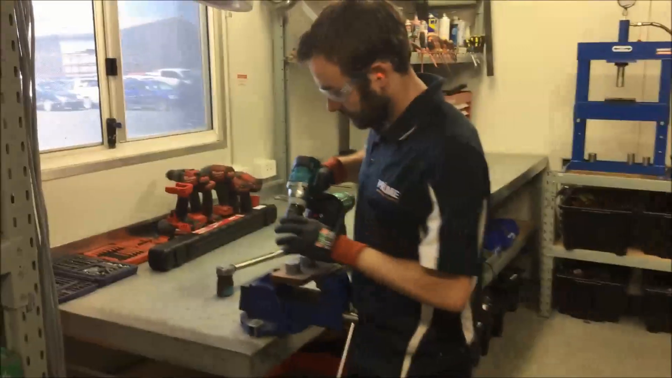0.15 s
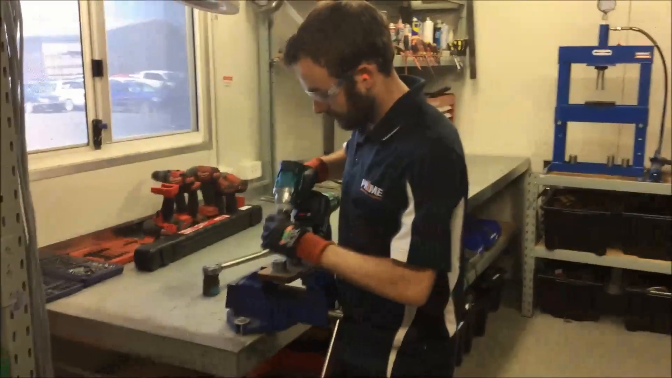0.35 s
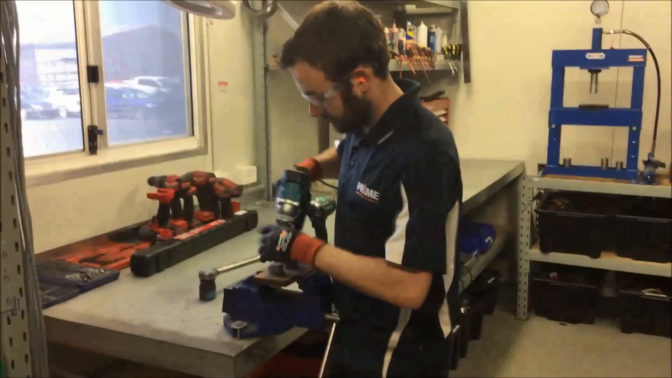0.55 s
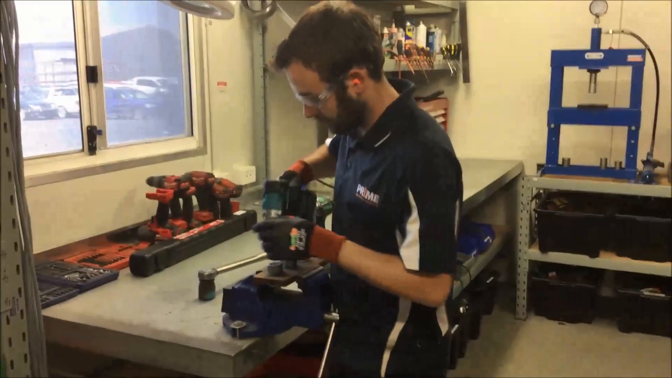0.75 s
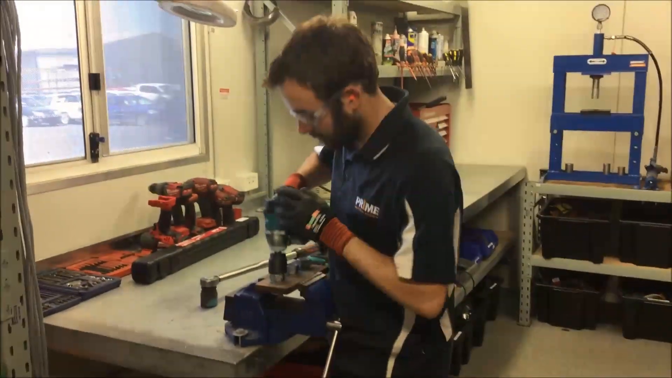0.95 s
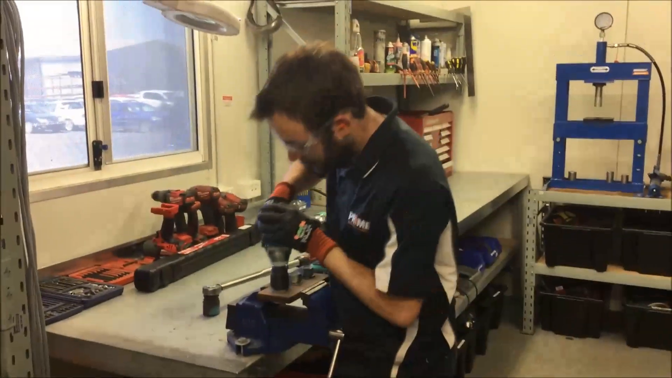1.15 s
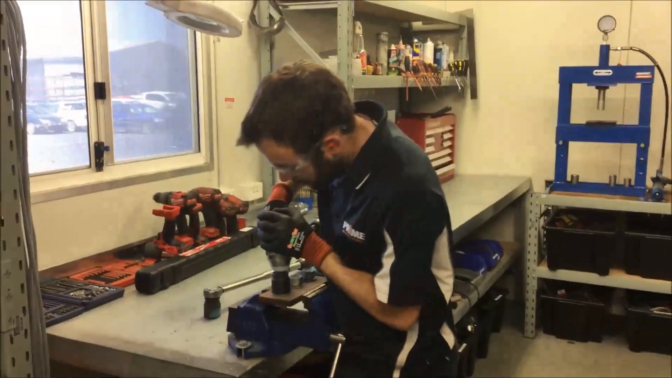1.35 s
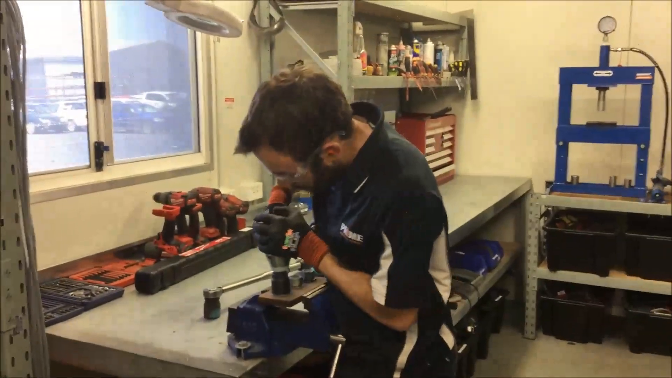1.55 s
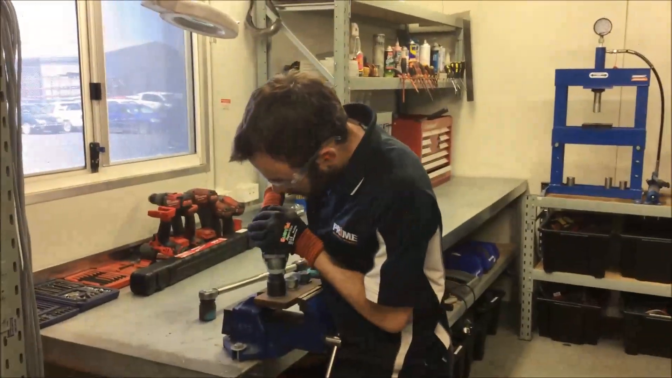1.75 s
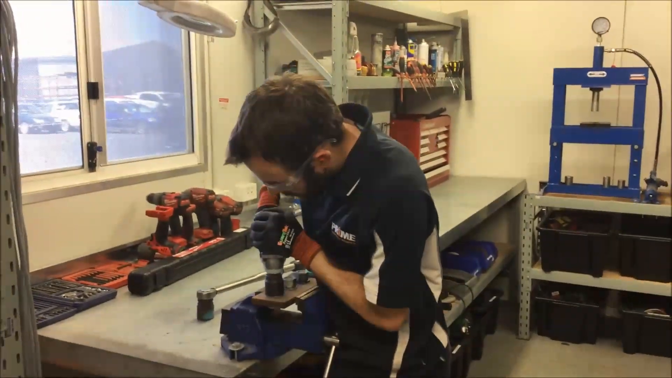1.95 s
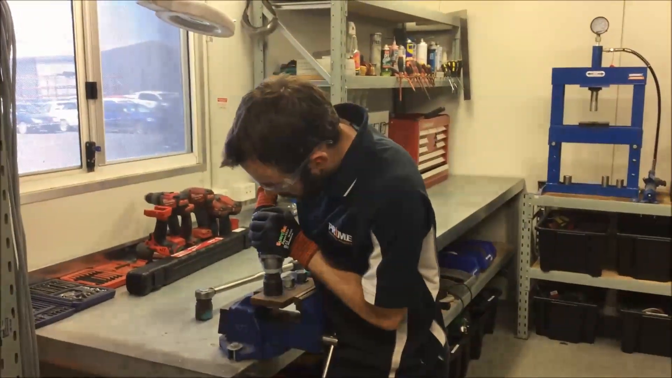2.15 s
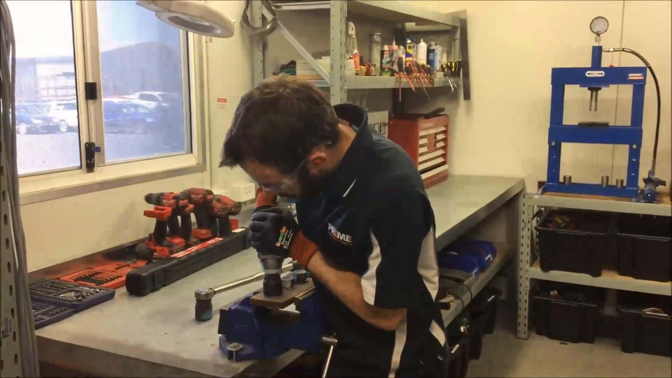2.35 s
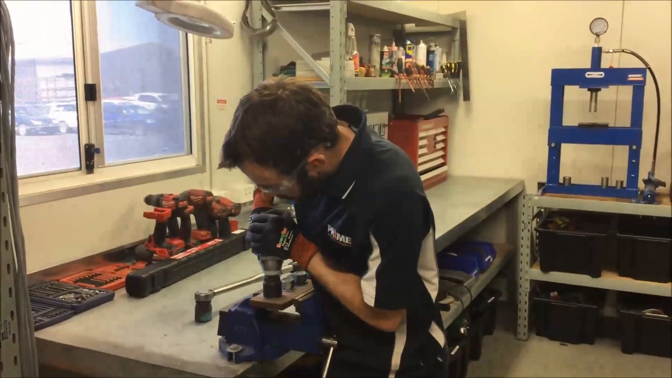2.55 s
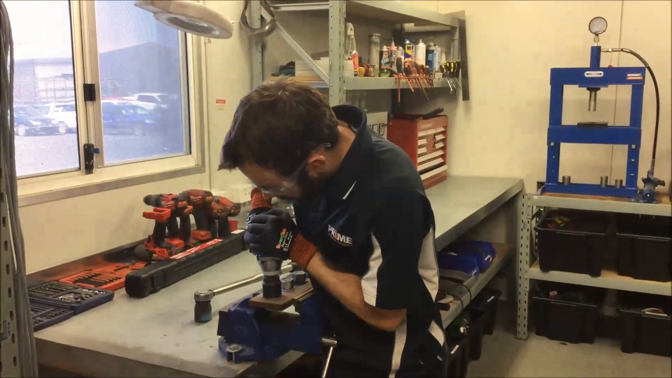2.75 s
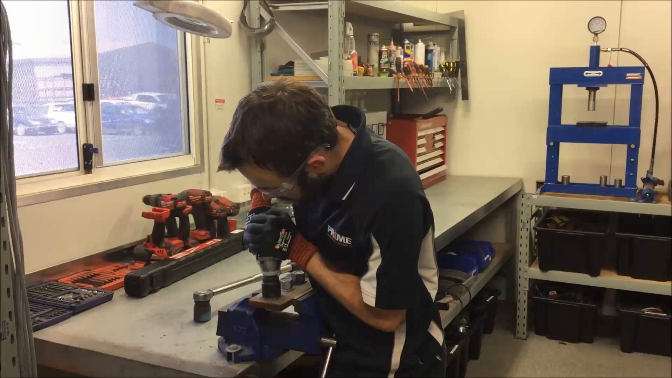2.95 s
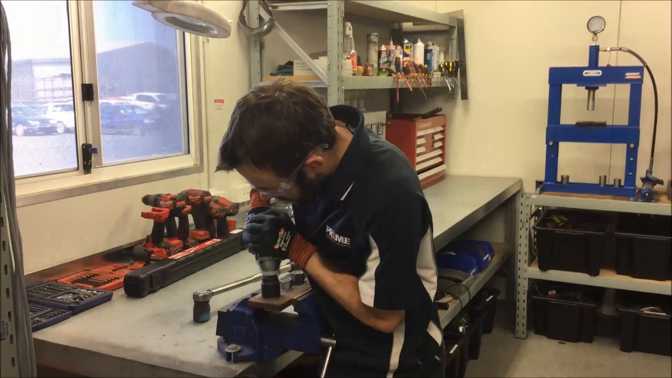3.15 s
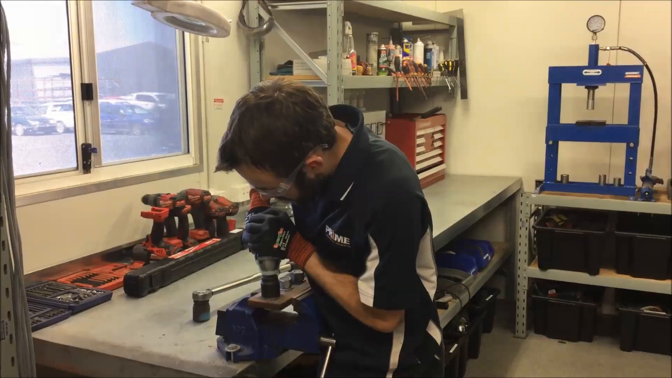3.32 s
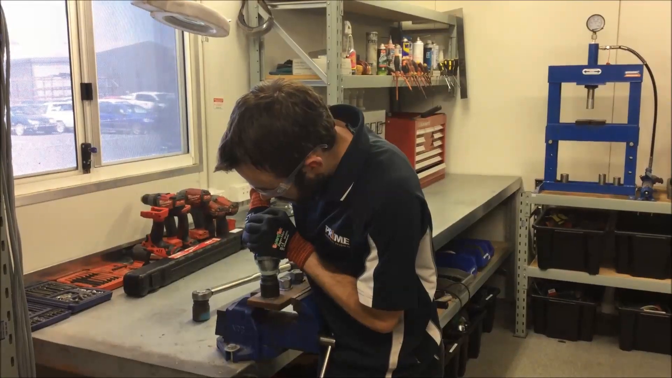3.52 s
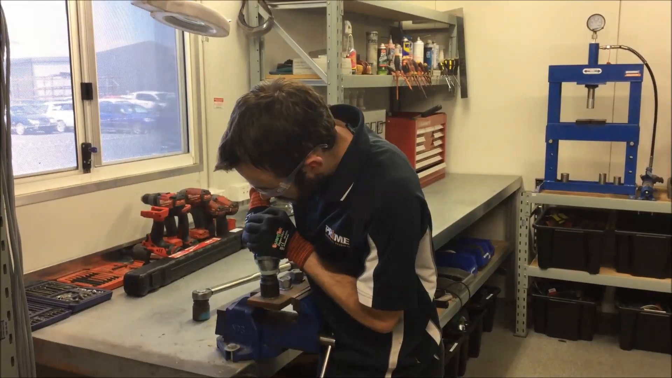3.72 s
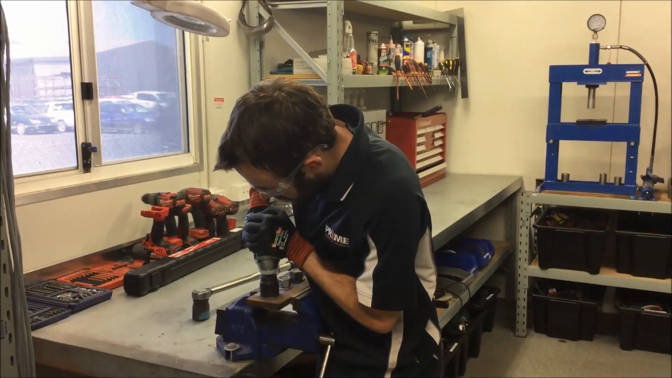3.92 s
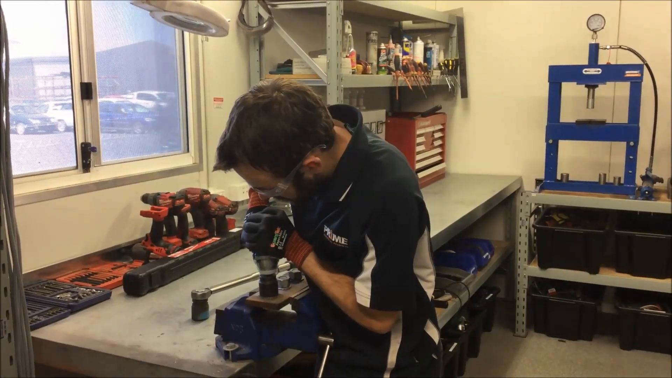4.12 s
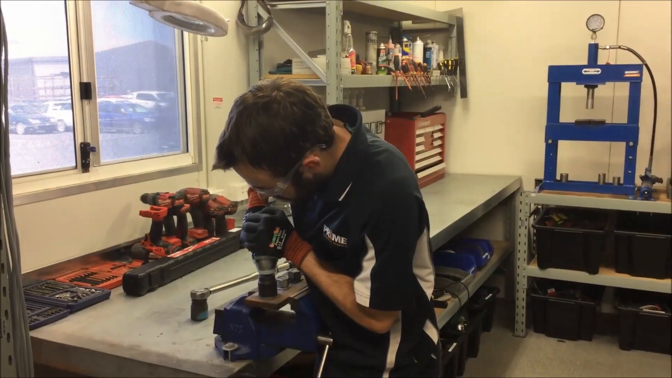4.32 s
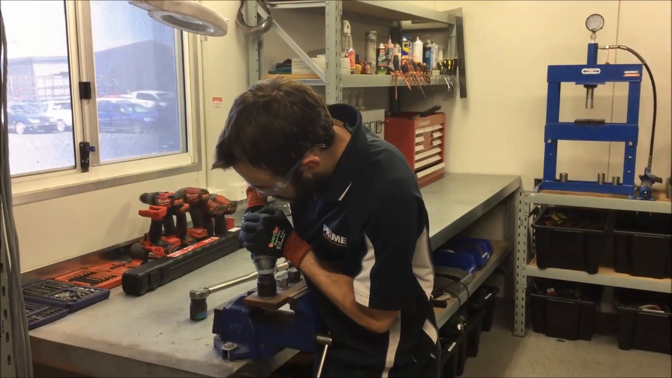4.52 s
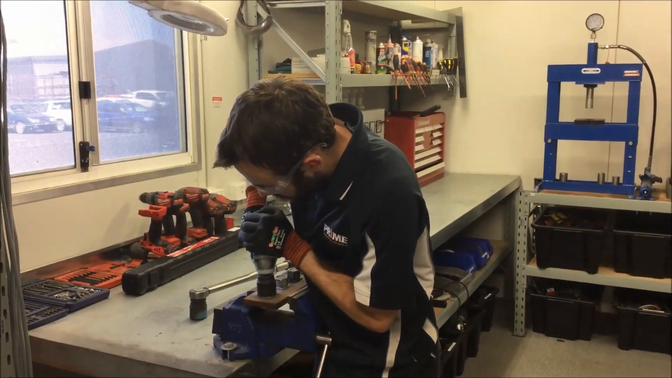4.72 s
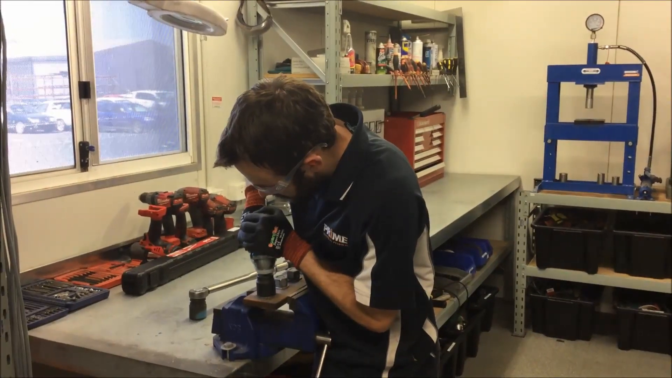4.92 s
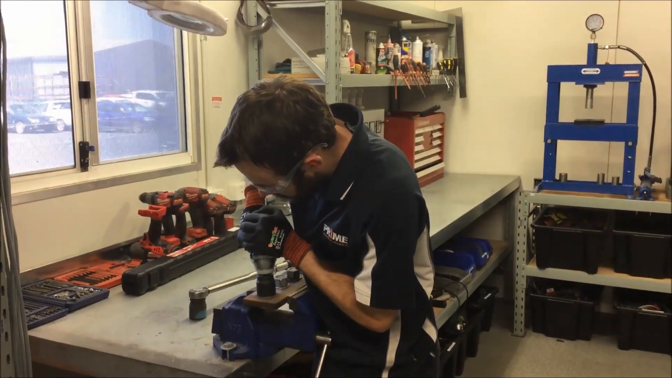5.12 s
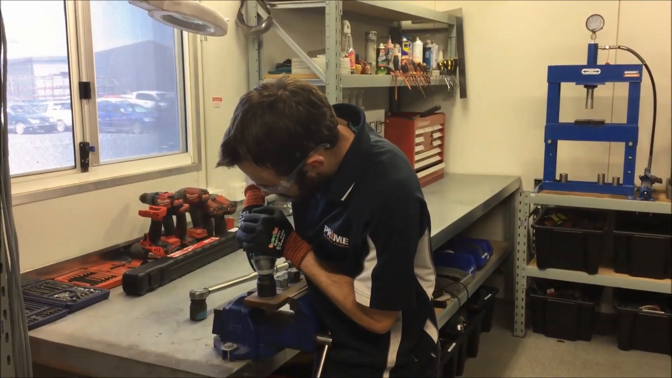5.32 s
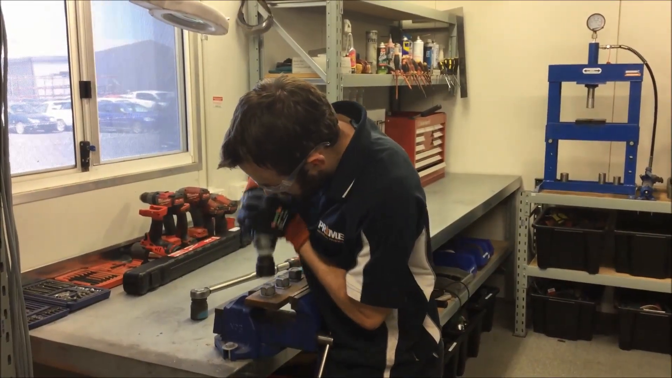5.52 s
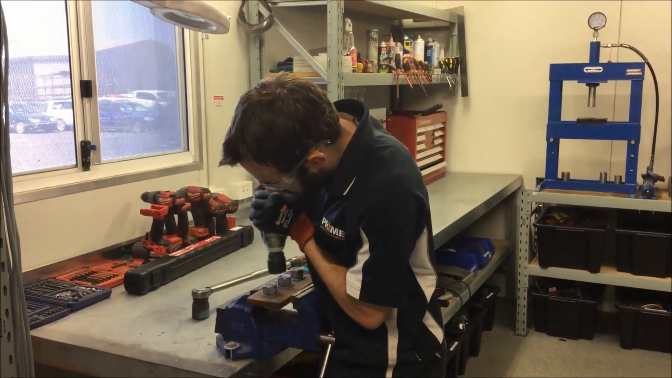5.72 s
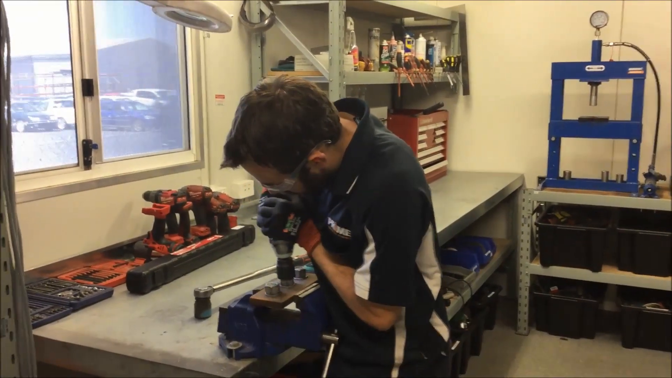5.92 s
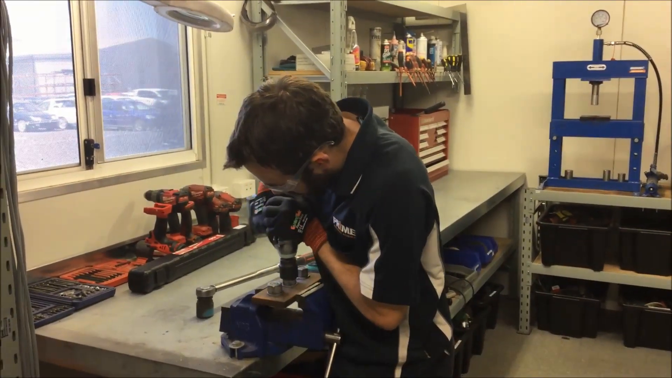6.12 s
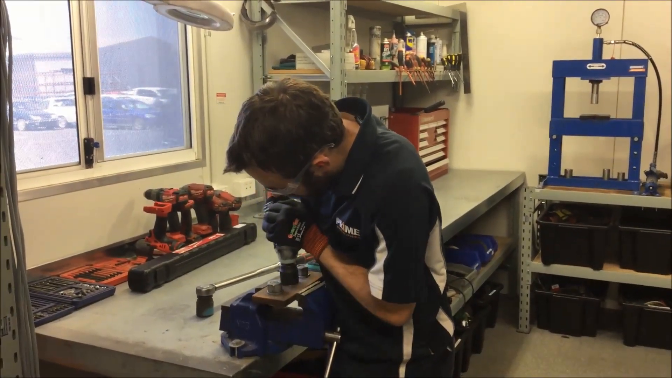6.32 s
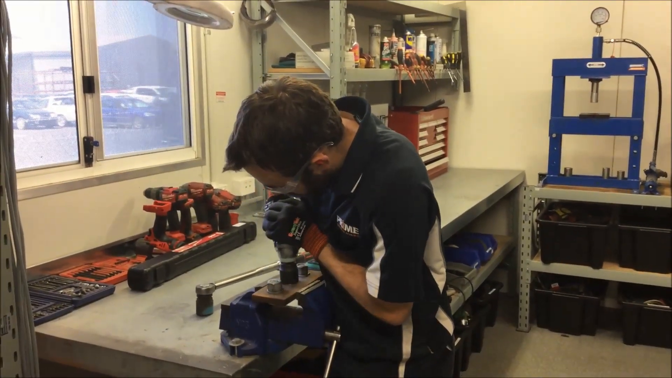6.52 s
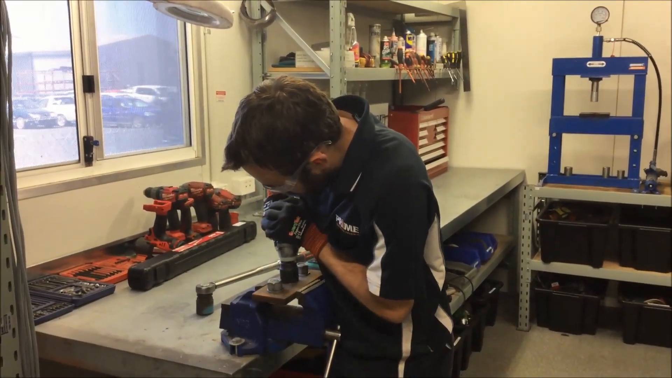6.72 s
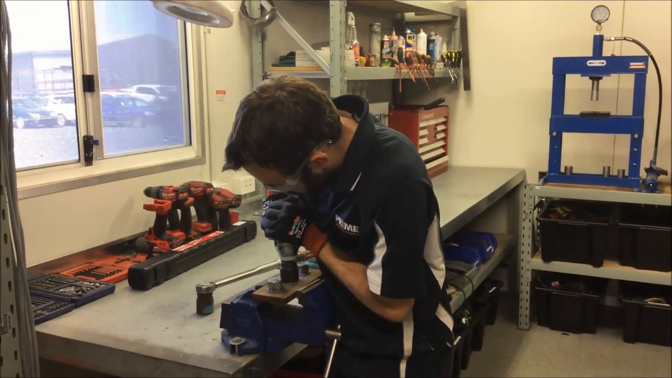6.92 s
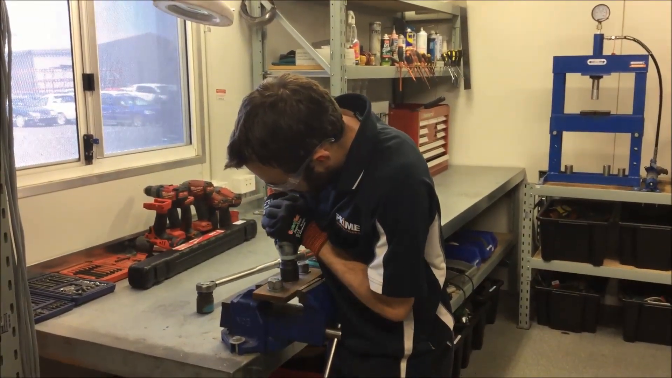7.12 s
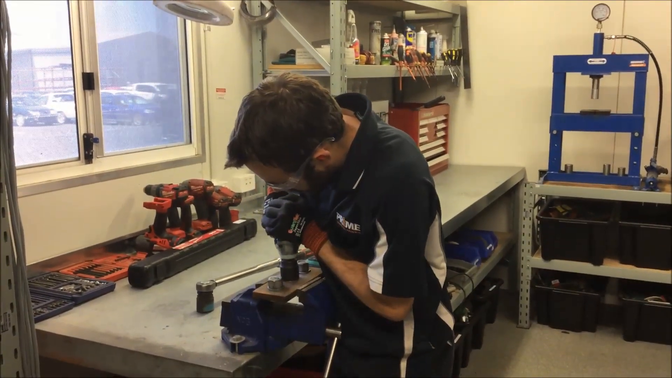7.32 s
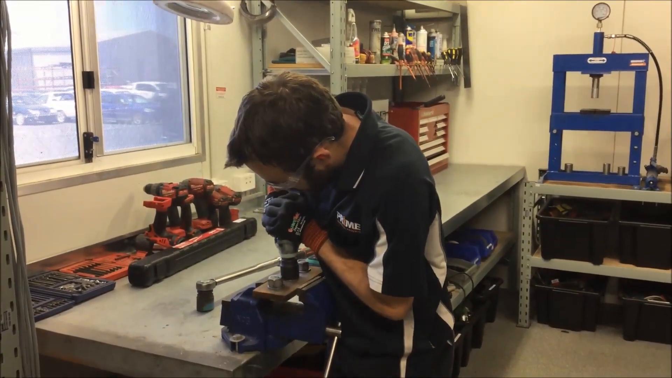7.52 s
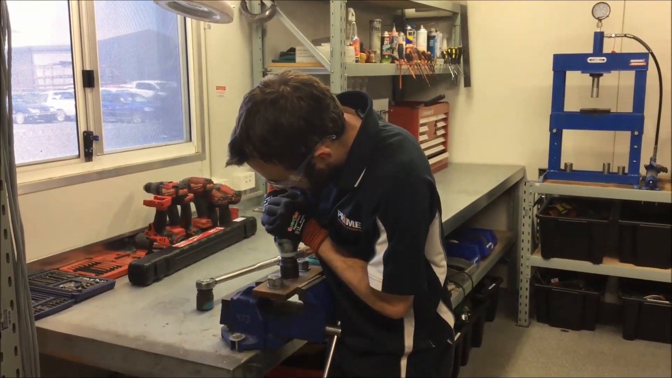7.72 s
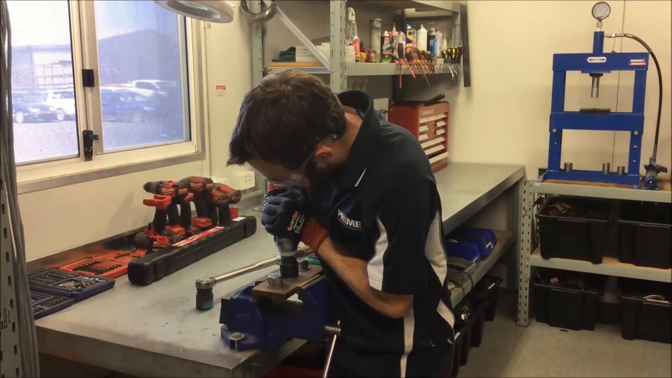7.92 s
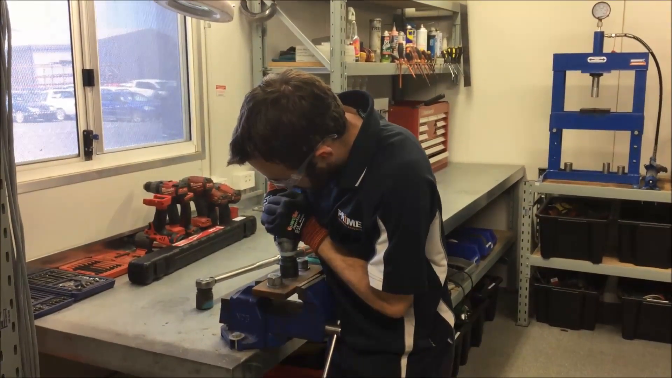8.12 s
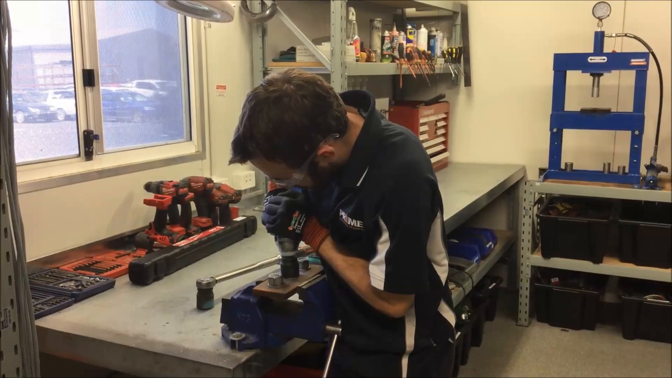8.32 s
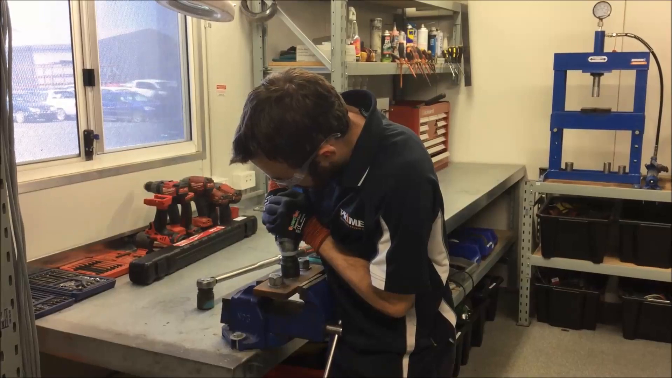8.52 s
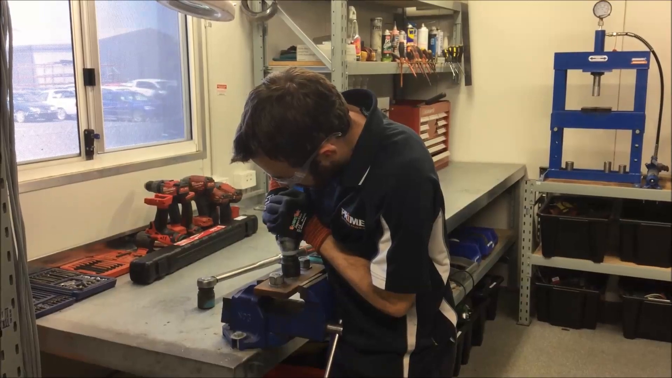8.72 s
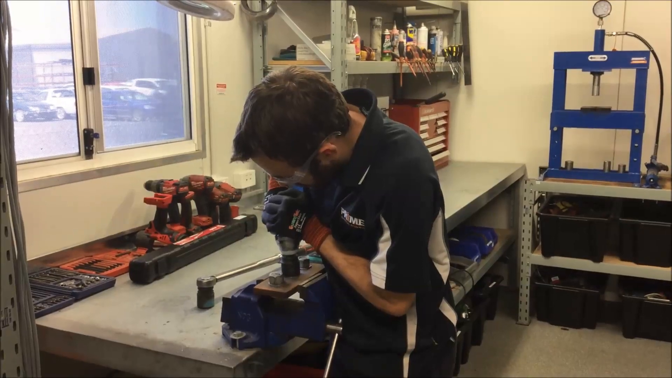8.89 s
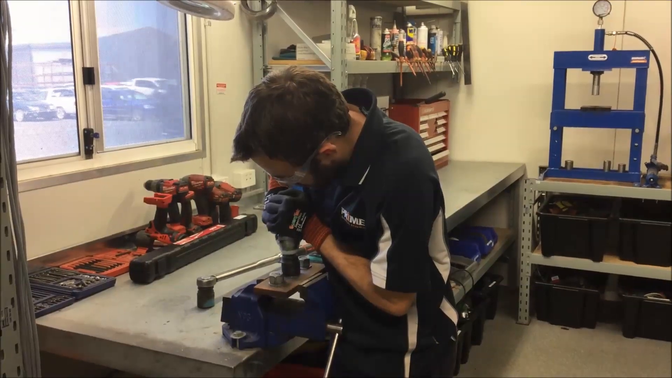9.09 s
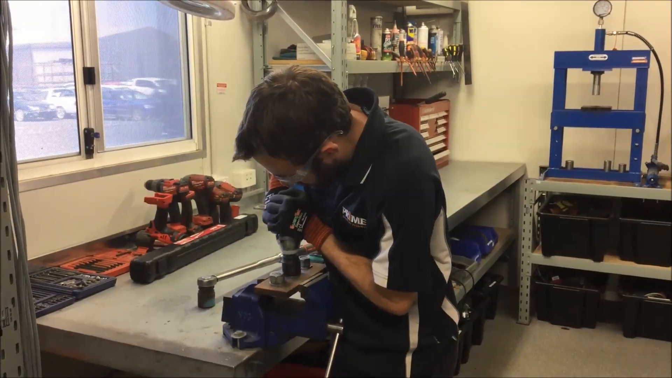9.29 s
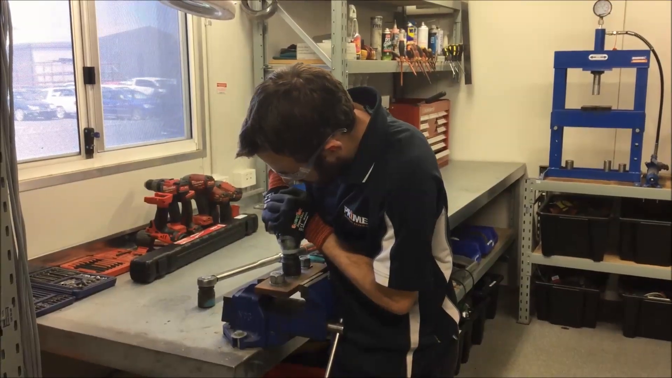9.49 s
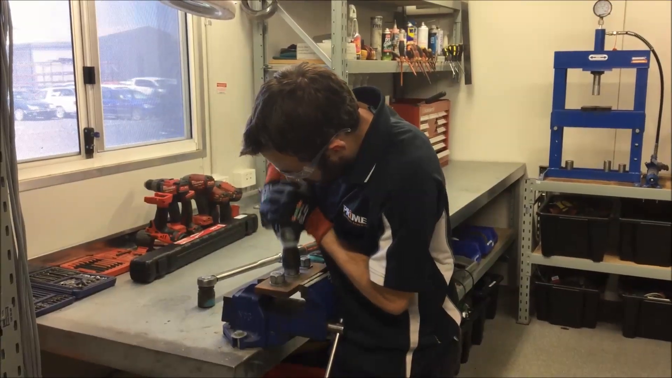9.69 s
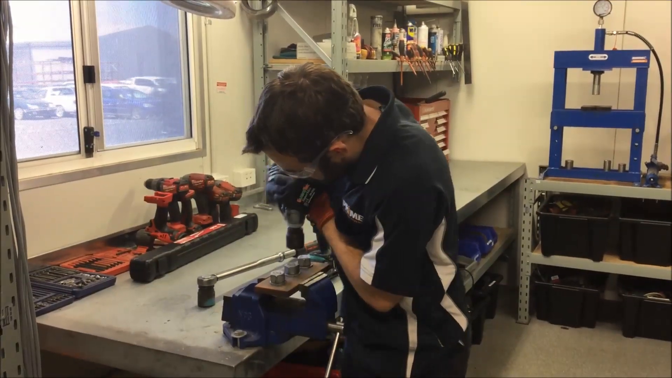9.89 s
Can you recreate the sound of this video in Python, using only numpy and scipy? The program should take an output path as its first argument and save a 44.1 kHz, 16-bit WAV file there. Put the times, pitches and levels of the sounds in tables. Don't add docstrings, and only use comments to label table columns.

```python
import sys
import numpy as np
from scipy import signal
from scipy.fft import rfft, irfft
from scipy.io import wavfile
from scipy.ndimage import uniform_filter1d

SR = 44100
rng = np.random.default_rng(int(sys.argv[2]) if len(sys.argv) > 2 else 0)


def transcribe(u):
    v = np.clip(np.atleast_2d(u).T, -1, 1)
    q = np.round(v * 32767).astype(np.int16)
    wavfile.write(sys.argv[1], SR, q)


def boost_factor(decibels):
    exponent = np.asarray(decibels, float) / 20
    return 10 ** exponent


N = 438794
T = np.arange(N) / SR

# frequency in Hz, level in dB per Hz.
RUMBLE = [(29, -25.5), (50, 2), (70, -9.5), (172, -14), (204, -21), (333, -26), (420, -47), (550, -71.5),
          (920, -120)]
HISS = [(240, -36), (400, -3.5), (949, -10.5), (1270, -7), (1600, -22), (7170, -31), (9180, -31),
        (13300, -35.5), (16000, -42.5)]
GLOVE = [(350, -53.5), (600, -19), (1010, -15), (1370, 3), (2500, -3), (2710, -4), (5220, -11), (9000, -38),
         (11700, -72), (19800, -120)]
MOTOR = [(290, -28), (500, -30), (1960, 7.5), (2820, 3), (6690, -17), (8130, -8.5), (14000, -27)]
CRACK = [(150, -24), (250, -5.5), (1180, -11.5), (1360, -7.5), (1530, -10.5), (3110, -10.5), (4170, -16.5),
         (5790, -14), (7380, -20.5), (10200, -19), (11400, -18), (12600, -18.5), (14700, -20.5),
         (15500, -21)]
SHELVES = [(45, -24), (90, 1), (130, 1), (230, -13.5), (350, -7), (450, -27), (700, -21), (1200, -40)]

# frequency in Hz, width in Hz, level in dB.
KNOCK_RING = [(750, 90, -3), (1087, 70, -4), (1380, 150, -1), (2600, 120, -1), (3182, 70, -3),
              (6000, 200, -9), (11050, 150, -5)]
BENCH_TOP = [(95, 31, 4), (169, 50, -0.5), (262, 74, -2.5), (356, 99, -3), (473, 260, -16)]
SLIDE = [
    [(3270, 60, -9), (3650, 45, 0)],
    [(5310, 40, -9), (6770, 45, 0), (7600, 40, -14)],
]
BENCH_LEGS = [(90, 10, 0), (130, 14, -4)]
STEEL = [(1024, 8.9, -7), (1804, 19, -16.5), (2190, 12, -10), (2440, 110, 0.5), (2752, 70, -2.5),
         (3157, 24, -1), (3678, 61, -4), (4633, 56, -2.5), (5140, 13, -15.5), (5830, 74, -6.5),
         (8090, 26, -10), (8710, 240, -3), (14500, 100, -21.5)]
PLATE = [(1328, 26, -12.5), (1427, 30, -14.5)]
SOCKET = [(11105, 70, 0), (11040, 60, -5), (11230, 90, -6), (10900, 150, -8)]
BENCH = [(67, 110, -6), (104, 86, -0.5), (201, 108, -3), (326, 200, -14), (570, 200, -12)]
VICE = [(430, 140, -3), (560, 160, 0), (700, 200, -3)]
# gain in dB, reversed on the second nut.
NUT_DB = [3.5, 1, -1.5, -1.5, 5, 1.5, 6.5, -1.5, 0.5, -2, -2, -0.5, 0]

# frequency in Hz, level in dB.
FAN = [(160, -66), (177.6, -64.5)]
# start in seconds, length in seconds, level in dB.
RUSTLE = [
    (0.0, .004, -56),
    (.18, 0.18, -70),
    (.44, .1, -68),
    (.51, 0.11, -61.5),
]
# start in seconds, thud in dB, vice in dB, steel in dB, treble loss in
# dB (about half of it in the top band).
KNOCKS = [(0.001, -44, -55, -65, 4), (0.189, -54, -66, -68, -7), (1.014, -38, -52, -30.5, 0.5),
          (1.043, -40, -47, -31.5, 5), (1.099, -36.5, -52, -44, 5), (1.119, -39, -48, -48, 6),
          (1.284, -38, -37, -32, 2.5), (1.31, -34.5, -45, -48, 12), (1.384, -43, -60, -60, 0),
          (1.469, -46, -63, -69, 5), (1.757, -51, -41, -54, 3), (1.771, -43, -44, -46, 3),
          (5.933, -44, -36.5, -35.5, -6), (5.971, -37.5, -41, -50, 3), (6.321, -31, -29, -31, -2),
          (6.343, -27, -26, -43, 10)]
# low edge in Hz, high edge in Hz.
KNOCK_BANDS = [(430, 900), (900, 1600), (1600, 4500), (4500, 11500)]
# band centre in Hz, time to fall 60 dB in seconds.
ROOM = [(90, 0.24), (180, 0.88), (360, 0.4), (720, 0.6), (1440, 1), (2900, 0.99), (5800, 1), (9000, 0.6),
        (14000, 0.3)]
# start in seconds, length in seconds, level in dB, octave level in dB.
WHINE = [
    (.02, .2, -85, -98),
    (1.9, .1, -88, -99),
    (2.21, .16, -75, -99),
    (2.45, .09, -79, -96),
    (5.7, 0.27, -61, -67),
    (6.08, 0.29, -70, -86),
    (6.36, .25, -82, -85),
]
# start in seconds, length in seconds, squeak in dB, upper squeak in dB.
SQUEAK = [
    (.04, .2, -76, -80),
    (.27, .06, -88, -98),
    (1.9, .2, -94, -108),
    (5.74, .12, -87, -89),
    (6.19, 0.15, -71, -72),
    (6.36, 0.078, -68, -73),
    (6.47, 0.16, -80, -82),
]
# start in seconds, level in dB.
BUMPS = [
    (.225, -40),
    (1.1, -46),
    (1.325, -39),
    (1.45, -46),
    (1.86, -48),
    (5.9, -48),
    (6.35, -40),
]
# start in seconds, level in dB, frequency in Hz.
TICKS = [
    (.452, -69, 2500),
    (.612, -65, 2490),
    (.615, -72, 5330),
    (6.30, -68, 11300),
]
# click in seconds, click in dB, end of the sound in seconds (the first blow #
# for a pull), motor there in dB.
TRIGGERS = [
    (2.548, -55.5, 2.581, -37),
    (6.647, -54, 6.697, -22),
    (6.669, -46, 7.5, -60),
    (6.679, -28, 6.2, -60),
]
# first blow in seconds, number of blows, steady period in seconds,
# seconds by which the first blow is early.
RUNS = [
    (2.589, 169, .0164105, .007),
    (6.6983, 178, .0164923, 0),
]
# plate at the start in dB, plate once clamped in dB,
# socket at the start in dB, socket at the end in dB.
RINGS = [
    (11, -15, -14, -13),
    (-12, -3, -17, -11),
]
# time in seconds, level in dB.
LEAN = [
    [(2.58, -35), (2.63, -27.5), (2.665, 6), (2.9, -4.5), (3.1, 0.5), (3.5, 1.5), (4.3, -4.5), (4.7, -2.5),
     (5.33, -1.5)],
    [(6.69, 4), (6.77, 0.5), (6.86, -2), (7.15, 0.5), (7.8, -2.6), (8.2, 1.5), (8.7, -3), (9.1, 0.4),
     (9.6, -2.3)],
]


def unit(x):
    return x / np.sqrt(np.sum(x ** 4) / np.sum(x ** 2) / 3)


def coloured(spectrum):
    hz, db = np.transpose(spectrum)
    f = np.arange(N // 2 + 1) * SR / N + 1
    gain = boost_factor(np.interp(np.log(f), np.log(hz), db, -120, -120))
    x = irfft(rfft(rng.standard_normal(N)) * gain, N)
    return x / x.std()


def walk(rate):
    k = int(SR / rate)
    return uniform_filter1d(np.repeat(rng.standard_normal(N // k + 1), k), k)[:N]


def swell(rows, column, attack_s, release_s):
    gain = 0
    for row in rows:
        rise = np.clip((T - row[0]) / attack_s, 0, 1)
        die = np.exp(-np.maximum(T - row[0] - row[1], 0) / release_s)
        gain = gain + boost_factor(row[column]) * rise * die
    return gain


def spikes(times, sizes):
    return np.bincount(np.clip((times * SR).astype(int), 0, N - 1), sizes, N)


def fade(x, seconds):
    return signal.lfilter([1], [1, -np.exp(-1 / (seconds * SR))], x)


def mode(x, hz, width):
    r, w = np.exp(-np.pi * width / SR), 2 * np.pi * hz / SR
    return signal.lfilter([0, np.sin(w)], [1, -2 * r * np.cos(w), r * r], x)


def ring(times, sizes, modes, steady, drift_db=0., nut_db=None):
    luck = steady + rng.standard_normal((len(times), len(modes)))
    out = 0
    for k, (hz, width, db) in enumerate(modes):
        grip = boost_factor(drift_db * walk(2.396)[(times * SR).astype(int)])
        if nut_db:
            grip = grip * boost_factor(nut_db[k] * np.sign(RUNS[1][0] - .5 - times))
        out = out + boost_factor(db) * np.sqrt(width) * mode(spikes(times, sizes * luck[:, k] * grip), hz, width)
    return out


def since_run():
    ends = [start + count * period for start, count, period, _ in RUNS]
    return np.min([np.where(T > end, T - end, np.inf) for end in ends], axis=0)


def ventilation():
    hum_hz, throb_hz, throb_peak_s, throb_depth = 44.17, 4.4, .05, .45
    duck_db, recover_s = 12, .6
    throb = 1 + throb_depth * np.cos(2 * np.pi * throb_hz * (T - throb_peak_s))
    hum = np.sqrt(2) * np.sin(2 * np.pi * hum_hz * T) * throb * boost_factor(-47 + 1.2 * walk(3))
    tones = sum(boost_factor(db + 2.0 * walk(3)) * np.sin(2 * np.pi * hz * T) for hz, db in FAN)
    duck = boost_factor(-duck_db * np.exp(-since_run() / recover_s))
    rumble = coloured(RUMBLE) * boost_factor(-47 + 1.2 * walk(6.5))
    hiss = coloured(HISS) * boost_factor(-72.5 + 1.0 * walk(2.6))
    return (hum + tones) * duck + rumble + hiss


def glove_rustle():
    return coloured(GLOVE) * boost_factor(-5.0 + 1.6 * walk(40.6)) * swell(RUSTLE, 2, attack_s=.021, release_s=.024)


def knocks(contact_s=0.0089):
    out, length = np.zeros(N), N // 30
    t = T[:length] / contact_s
    contact = np.exp(-t) * (1 - np.exp(-t / 0.26)) ** 2
    for s, thud_db, vice_db, steel_db, loss_db in KNOCKS:
        push = rng.standard_normal((len(KNOCK_BANDS), length)) * contact
        ringing = 0
        for hz, width, db in KNOCK_RING:
            ringing = ringing + rng.standard_normal() * boost_factor(db) * np.sqrt(width) * mode(push, hz, width)
        steel = push + boost_factor(-54) * ringing
        band_db = [vice_db, steel_db, steel_db - loss_db, steel_db - 11 - 0.47 * loss_db]
        tap = 0
        for band, x, db in zip(KNOCK_BANDS, steel, band_db):
            part = signal.sosfilt(signal.butter(2, band, "band", fs=SR, output="sos"), x)
            tap = tap + boost_factor(db + 10) * part / np.abs(part).max()
        thud = sum(boost_factor(db) * np.sqrt(width) * mode(push[0], hz, width) for hz, width, db in BENCH_TOP)
        start = int(s * SR)
        out[start:start + length] += tap + boost_factor(thud_db + 15) * thud / np.abs(thud).max()
    return out


def room(x, gap_s=0.0042, build_s=0.005, near_db=7.5, near_s=0.053):
    t = np.arange(SR) / SR
    hz, t60 = np.transpose(ROOM)
    edges = np.r_[40, np.sqrt(hz[1:] * hz[:-1]), 18000]
    hasten = 1 + (t / .9) ** 2
    tail = 0
    for low, high, decay in zip(edges, edges[1:], t60):
        band = signal.butter(2, [low, high], "band", fs=SR, output="sos")
        noise = signal.sosfilt(band, rng.standard_normal(SR))
        tail = tail + noise * boost_factor(-60 * t / decay * hasten) / np.sqrt(decay)
    tail = tail * (1 + boost_factor(near_db) * np.exp(-t / near_s))
    tail = tail * (1 - np.exp(-np.maximum(t - gap_s, 0) / build_s))
    return signal.fftconvolve(x, tail / np.sqrt(np.sum(tail ** 2)))[:N]


def stick_slip():
    return rng.standard_normal(N) * boost_factor(4.5 * walk(35))


def plate_whine(slips):
    low = unit(mode(mode(rng.standard_normal(N), 1250, 60), 1270, 24)) * boost_factor(4.5 * walk(30) - 3.0)
    octave = unit(mode(mode(slips, 2590, 120), 2590, 40))
    low = low * swell(WHINE, 2, attack_s=.05, release_s=.013)
    return low + octave * swell(WHINE, 3, attack_s=.05, release_s=.015)


def socket_squeaks(slips):
    groups = []
    for modes in SLIDE:
        squeal = 0
        for hz, width, db in modes:
            narrow = mode(mode(slips, hz, 4 * width), hz, width)
            squeal = squeal + boost_factor(db) * np.sqrt(width) * narrow * width
        groups.append(unit(squeal))
    low = groups[0] * boost_factor(6.0) * swell(SQUEAK, 2, attack_s=.02, release_s=.02)
    return low + groups[1] * boost_factor(2.0) * swell(SQUEAK, 3, attack_s=.018, release_s=.02)


def bumps(push_s=.006):
    times, db = np.transpose(BUMPS)
    push = fade(spikes(times, boost_factor(db)), push_s) / (push_s * SR)
    return boost_factor(12.5) * sum(boost_factor(level_db) * mode(push, hz, width) for hz, width, level_db in BENCH_LEGS)


def ring_ticks():
    return sum(boost_factor(db + 10) * mode(spikes(np.array([s]), [1.]), hz, 60) for s, db, hz in TICKS)


def motor_windup(click_s=.015, rise_db_per_s=1296):
    level = 0
    for pull, click_db, hit, top_db in TRIGGERS:
        click = boost_factor(click_db) * np.exp(-np.abs(T - pull) / click_s)
        spin = boost_factor(top_db - rise_db_per_s * np.abs(hit - T))
        level = level + ((T > pull) & (T < hit)) * (click + spin)
    return coloured(MOTOR) * boost_factor(2.5 * walk(250)) * level


def blows():
    out = []
    for (start, count, period, early), (plate_start, plate_end, socket_start, socket_end) in zip(RUNS, RINGS):
        k = np.arange(count)
        times = start + k * period - .022 * (1 - np.exp(-k / 30)) - early * (k == 0)
        effort_db = -11.5 - 6.5 * np.exp(-k / 0.53) + 1.84 * (k / count - .5) - 4.5 * (k == count - 1)
        plate_db = plate_end + (plate_start - plate_end) * np.exp(-(k / 26) ** 3)
        socket_db = socket_start + (socket_end - socket_start) * np.minimum(2 * k / count, 1)
        out.append([times, effort_db, plate_db, socket_db])
    return np.hstack(out)


def wrench():
    times, *laws = blows()
    effort_db, plate_db, socket_db = (np.interp(T, times, db) for db in laws)
    chance = rng.standard_normal((len(times), 5)).T
    times = times + .0004 * chance[0]
    sizes = boost_factor(2.53 * chance[1])
    rebound = times + .007 + .0025 * chance[2]
    rebound_sizes = .45 * boost_factor(3.0 * chance[3])
    both, weights = np.r_[times, rebound], np.r_[sizes, rebound_sizes]

    burst = fade(spikes(both, weights), 0.006) + .25 * fade(spikes(times, sizes), 0.0074)
    burst = fade(burst, 0.0005)
    chatter = np.repeat(times, 6) + .016 * rng.random(6 * len(times))
    chatter_sizes = boost_factor(5.4 * rng.standard_normal(len(chatter)))
    clatter = ring(chatter, chatter_sizes, STEEL, 0., nut_db=NUT_DB)
    crack = unit(burst * coloured(CRACK))
    steel = ring(both, weights, STEEL, 0.79, drift_db=2.5, nut_db=NUT_DB)
    crack = crack + boost_factor(-6.5) * unit(steel) + boost_factor(-8.5) * unit(clatter)

    plate = unit(ring(both, weights, PLATE, 0.57)) * boost_factor(plate_db - 14 + 1.2 * walk(9))
    socket = unit(ring(both, weights, SOCKET, 0.13)) * boost_factor(socket_db + 11.0 + 2.5 * walk(9))

    kicks = np.r_[times + .0015, rebound + .002] + 0.00063 * rng.standard_normal(len(both))
    kick_sizes = np.r_[sizes ** .4, .45 * boost_factor(2.0 * chance[3])] * boost_factor(2.2 * np.tile(chance[4], 2))
    lean_db = np.interp(T, *np.concatenate(LEAN).T)
    jolt = -unit(ring(kicks, kick_sizes, BENCH, 0.99, drift_db=2.0)) * boost_factor(lean_db + 10.5 + 0.98 * walk(11))
    punch = ring(times + 0.00085, sizes * boost_factor(2.8 * chance[4]), VICE, 0.55, drift_db=2.5)
    jolt = jolt + boost_factor(1.5) * unit(punch)
    effort = boost_factor(effort_db + 1.1 * walk(12))
    return effort * (crack + plate), effort * socket, effort * jolt


def shelves():
    return coloured(SHELVES) * boost_factor(-34.5 - 35 * since_run() + 2.0 * walk(11))


def scene():
    clang, socket, jolt = wrench()
    taps = knocks()
    slips = stick_slip()
    hands = socket_squeaks(slips) + plate_whine(slips) + glove_rustle() + motor_windup() + ring_ticks()
    sent = boost_factor(-6.0) * hands + boost_factor(-1.0) * clang + boost_factor(-6) * socket + boost_factor(-11.5) * taps + boost_factor(-22) * jolt
    sway = np.cumsum(1.5 + 2.99 * walk(3)) * 2 * np.pi / SR
    wet = room(sent * np.cos(sway)) + room(sent * np.sin(sway))
    hidden = boost_factor(-11) * taps
    background = ventilation() + bumps() + shelves()
    return (clang + boost_factor(-2.5) * socket + hidden + wet + jolt + hands + background)[None]


def top_cut(x):
    return signal.sosfilt(signal.butter(12, 16310, fs=SR, output="sos"), x)


def record(dry):
    x = signal.sosfilt(signal.butter(4, 42, "high", fs=SR, output="sos"), dry)
    x = x / (1 + np.abs(x / 0.86) ** 1.7) ** (1 / 2.27)
    x = signal.sosfiltfilt(signal.butter(2, 30, "high", fs=SR, output="sos"), x)
    x = x / (1 + np.abs(x / 1.27) ** 6) ** (1 / 6)
    x = signal.sosfilt(signal.ellip(10, .2, 42, 15350, fs=SR, output="sos"), x)
    return top_cut(x)


dry = scene()
out = record(dry)
transcribe(out)
```